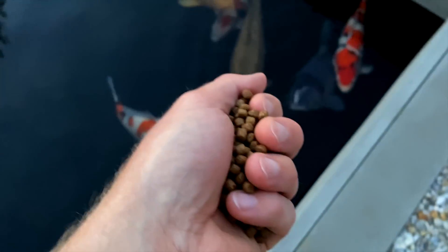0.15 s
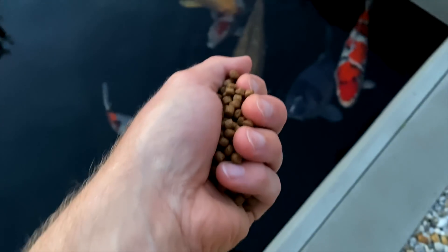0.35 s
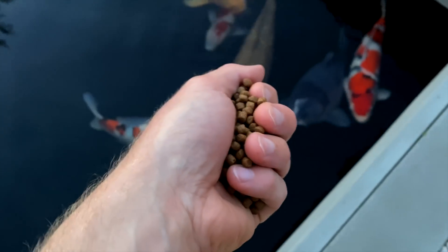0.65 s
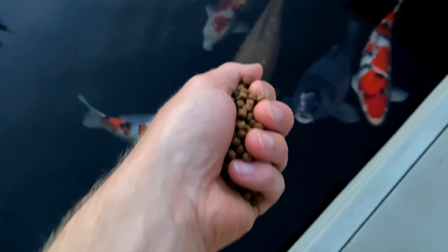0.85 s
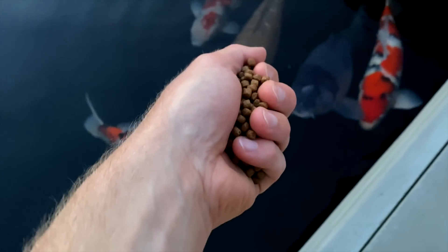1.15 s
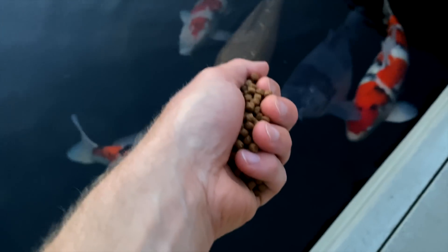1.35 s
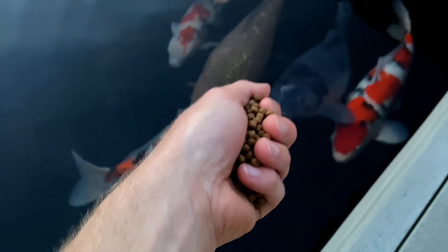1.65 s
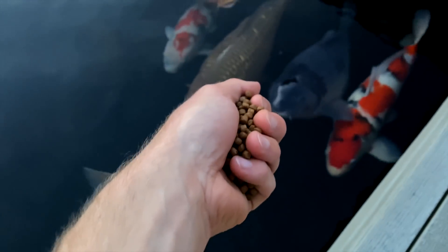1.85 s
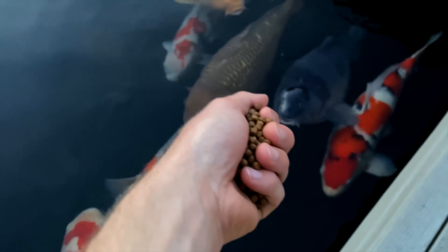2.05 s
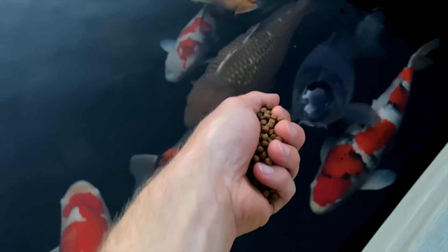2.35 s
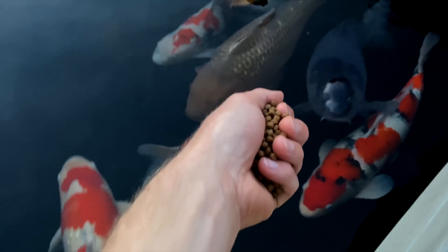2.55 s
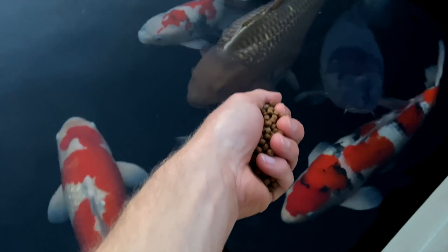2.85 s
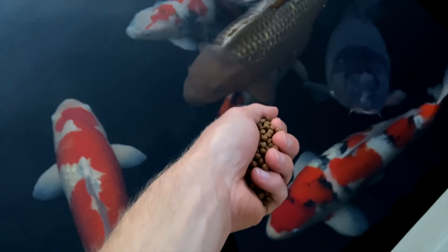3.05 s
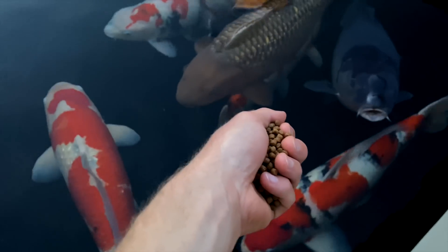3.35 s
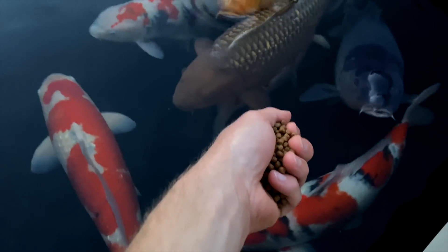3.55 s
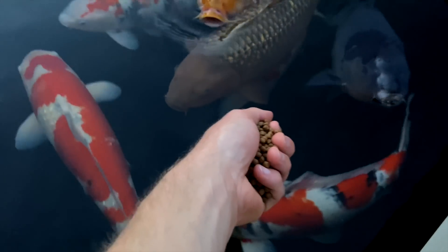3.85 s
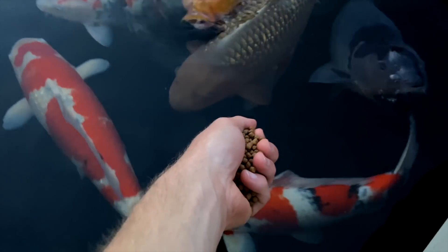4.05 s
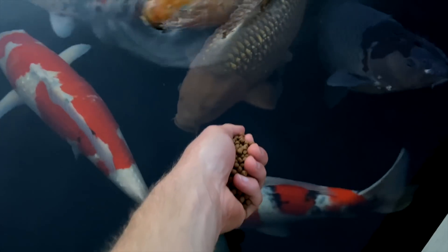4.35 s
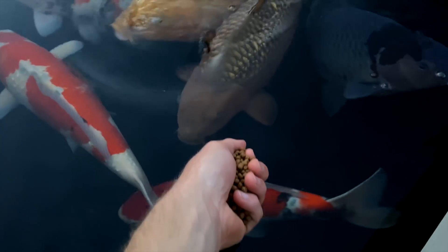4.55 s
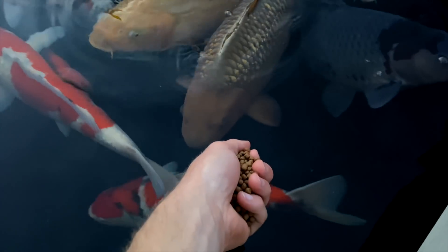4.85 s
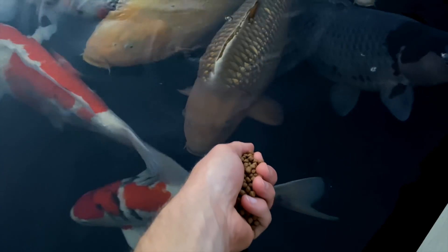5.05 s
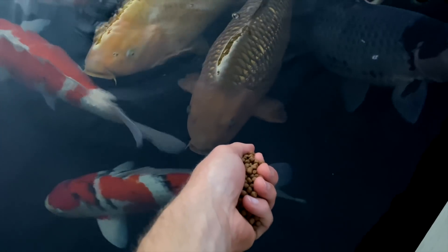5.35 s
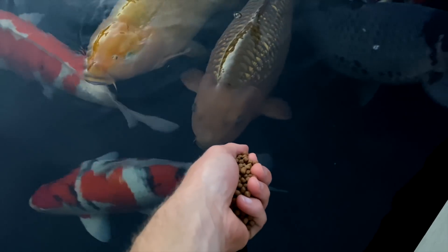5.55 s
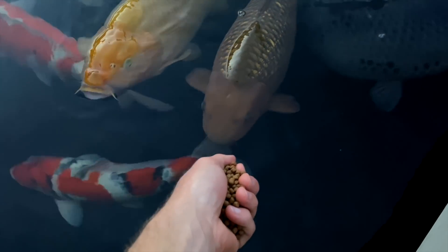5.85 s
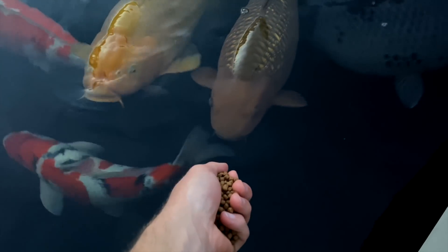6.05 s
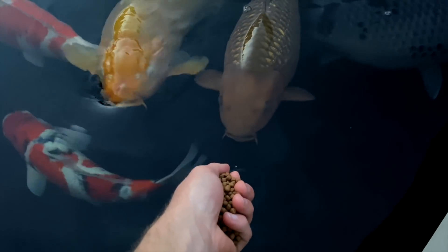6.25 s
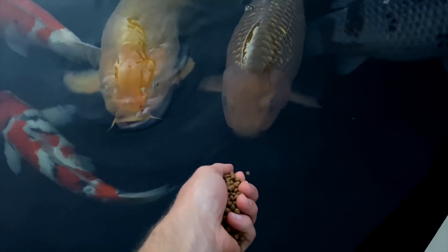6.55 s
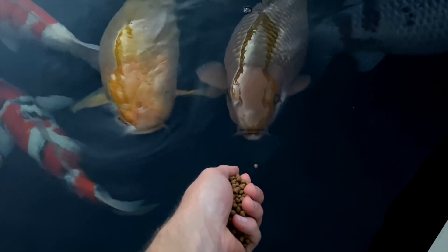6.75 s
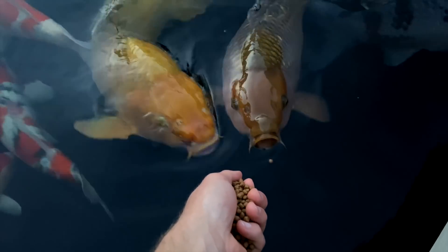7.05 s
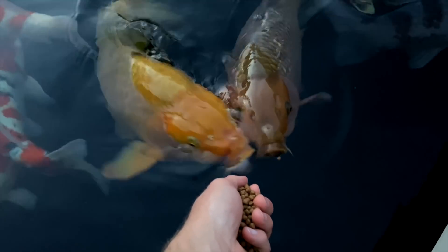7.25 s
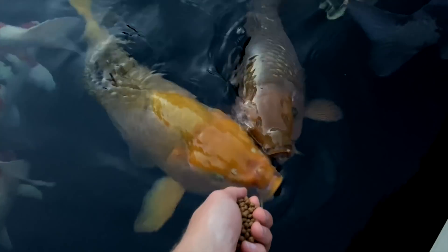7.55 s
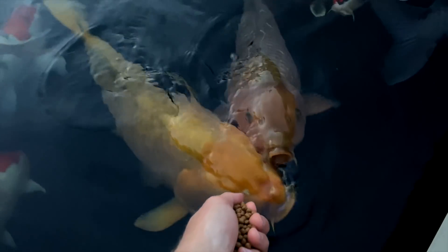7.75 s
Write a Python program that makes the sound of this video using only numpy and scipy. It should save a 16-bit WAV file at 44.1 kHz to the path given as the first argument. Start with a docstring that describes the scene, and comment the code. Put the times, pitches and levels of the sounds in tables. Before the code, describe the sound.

Steady mains hum and hissing, trickling water, bright dry pellet clicks close by, then small wet snaps as koi break the surface.

```python
"""An electric pump hums beside a koi pond over running water; both swell in while food pellets crackle in a fist.
The hum is a sum of mains harmonics and wavering housing tones; the water is filtered noise with ringing bubbles.
Pellets are decaying noise bursts and air bumps the microphone as low noise; water rings hollow in a narrow band,
and a thin whistle and faint chirps are wavering tones.
Fish break the surface midway and at the end: a snap, a ringing bubble, spray and a wall echo."""
import sys
import numpy as np
from scipy import signal
from scipy.fft import rfft, irfft, next_fast_len
from scipy.io import wavfile
from scipy.ndimage import uniform_filter1d

SR = 44100
rng = np.random.default_rng(int(sys.argv[2]) if len(sys.argv) > 2 else 0)


def dump_mix(stems):
    """Bounce the given channels to the path in sys.argv[1] as a 16-bit WAV at rate SR."""
    frames = np.atleast_2d(stems).T  # one column per channel
    limited = np.clip(frames, -1, 1)  # hard clip at full scale
    pcm = np.round(limited * 32767).astype(np.int16)
    wavfile.write(sys.argv[1], SR, pcm)


N = 348831
TIME = np.arange(N) / SR
HUM_RISE_S = 1.08  # shared by the hum and the rumble


def gain_of(db):
    """Level to amplitude: 20 dB is a factor of ten."""
    return 10 ** (np.asarray(db) / 20)


def evened(x):
    """Normalization by the root mean square, to rms 1."""
    return x / np.sqrt(np.mean(x ** 2) + 1e-20)


def read(points, hz):
    """Spectral envelope: straight lines between points on a log-frequency axis."""
    f, value = np.transpose(points)
    return np.interp(np.log(hz + 1), np.log(f + 1), value)


def bell(hz, centre_hz, octaves):
    """Resonance curve: a Gaussian in log frequency, down to 1/e at the given distance in octaves."""
    return np.exp(-(np.log2(hz / centre_hz) / octaves) ** 2)


def add(mix, s, sound):
    """Superposition: adds a stereo sound into the mix at time s."""
    part = mix[:, max(round(s * SR), 0):][:, :sound.shape[1]]
    part += sound[:, :part.shape[1]]


def wander(rate_hz, count=10):
    """Slow random modulation: sines of random speed up to rate_hz and random phase, rms about 1."""
    coarse = TIME[::128]
    speed, phase = rng.random((2, count, 1))
    sines = np.sin(2 * np.pi * (rate_hz * speed * coarse + phase))
    return np.interp(TIME, coarse, sines.sum(0) * np.sqrt(2 / count))


def swell(start_db, rise_s):
    """Stretched-exponential approach: a level in dB that climbs from start_db and settles at 0."""
    rise_shape = 1.28  # above 1 the rise starts slowly
    return start_db * np.exp(-(TIME / rise_s) ** rise_shape)


def bumps(rows):
    """Gaussian level changes in dB, from rows of (centre [s], half length [s], level [dB])."""
    return sum(db * np.exp(-((TIME - s) / half) ** 2) for s, half, db in rows)


def held(start, end, fade_s):
    """Trapezoidal envelope: fades in around start, holds, and fades out around end."""
    return np.clip(np.minimum(TIME - start, end - TIME) / fade_s + .5, 0, 1)


def band_noise(size, hz, octaves):
    """Spectral filtering: two unrelated white noises shaped to a bell-shaped band."""
    f = np.fft.rfftfreq(size, 1 / SR) + 1
    white = rng.standard_normal((2, size))
    return evened(irfft(rfft(white) * bell(f, hz, octaves), size))


def paired(z, same):
    """Partial coherence: gives two unrelated signals the correlation same."""
    same = np.clip(same, -1, 1)
    return np.array([z[0], same * z[0] + np.sqrt(1 - same ** 2) * z[1]])


def at_ports(z, hz):
    """Spaced reception: coherence, phase and level between two ports, for spectra with frequency last."""
    # two spaced microphone ports; the treble comes from one side:
    # (frequency [Hz], coherence, phase by which right leads [rad], left-right level [dB])
    ports = [(25, 0.9, 1.5, -1), (60, 1, 0, -1.5), (130, 0.91, 0.13, 0), (290, 0.85, 0, -1.5),
             (460, 0.77, -0.5, 0.5), (607, 0.58, -0.2, 0.5), (922, 0.22, -1.28, -0.5),
             (1480, 0.049, -4.5, -1), (1880, 0.88, -4.5, -1.5), (2310, 0.26, -6.5, -0.7),
             (3250, 0.27, -7, -1), (4400, 0.82, -7.5, -1), (5330, 0.19, -6, 1.5), (6870, 0.27, -6, 0.5),
             (8650, 1, -2.5, 0), (10170, 1, -0.03, 0), (12170, 1, 3.5, -1.5), (15300, 0.96, 8, 1)]
    f, *columns = np.transpose(ports)
    same, lead, pan_db = (np.interp(hz, f, column) for column in columns)
    left, right = paired(z, same)
    return np.array([left * gain_of(pan_db / 2), right * gain_of(-pan_db / 2) * np.exp(1j * lead)])


def soft_bursts(rows, octaves, same):
    """Windowed band noise, one burst for each row (centre [s], length [s], frequency [Hz], level [dB])."""
    out = np.zeros((2, N))
    for s, length, hz, db in rows:
        size = round(length * SR)
        burst = paired(band_noise(SR, hz, octaves), same)[:, :size] * np.hanning(size)
        add(out, s - length / 2, gain_of(db) * evened(burst))
    return out


def tones(rows, waver_db, slip):
    """Amplitude and phase modulation: steady tones that waver in level and slip in phase (radians)."""
    total = 0
    for hz, db in rows:
        level = gain_of(db + waver_db * wander(2))
        total = total + level * np.sin(2 * np.pi * (hz * TIME + rng.random()) + slip * wander(2))
    return np.sqrt(2) * total


def buzz(low_hz=270, high_hz=780, level_db=-64, tilt_db=-1, waver_db=2, count=26):
    """Inharmonic partials of the rattling pump casing, each with its own phase at the two ports."""
    out = np.zeros((2, N))
    for index, (offset, phase, side) in enumerate(rng.random((count, 3))):
        hz = low_hz * (high_hz / low_hz) ** ((index + offset) / count)
        level = gain_of(level_db + tilt_db * np.log2(hz / low_hz) + waver_db * wander(1.55))
        port_phase = np.array([[0], [2 * side - 1]])
        out += np.sqrt(2) * level * np.sin(2 * np.pi * (hz * TIME + phase) + port_phase)
    return out


def pump(waver_db=0.13, overtone_waver_db=0.4):
    """Harmonic vibration: the motor hums on multiples of the mains; its housing shakes less steadily."""
    mains_hz, start_db = 50.01, -15.5
    # harmonics of the hum: (multiple of the mains, level [dB], left-right level [dB])
    harmonics = [(2, -26, -1.1), (3, -40, -3.5), (4, -38.5, -4), (5, -53.5, 1), (6, -53.5, -9),
                 (7, -56.5, -5), (8, -59.5, -3)]
    # wavering tones of the shaking housing: (frequency [Hz], level [dB])
    housing = [(112.5, -49), (118.8, -47), (158.8, -55), (163, -53), (181.1, -48.5), (212.6, -52),
               (218.7, -56), (231.2, -58), (262.5, -57.5), (268.7, -57), (287.5, -59.5), (331.2, -61.5),
               (337.5, -60.5), (412.5, -60), (462.6, -55), (468.8, -56), (531, -55)]
    # brief dips of the hum: (centre [s], half length [s], level change [dB])
    dips = [(4.8, .15, -3), (7.6, 0.15, -2)]
    out = np.zeros((2, N)) + tones(housing, waver_db=1.5, slip=0.48) + buzz()
    for index, (multiple, db, pan_db) in enumerate(harmonics):
        depth_db = overtone_waver_db if index else waver_db
        line = np.sqrt(2) * np.sin(2 * np.pi * (multiple * mains_hz * TIME + rng.random()))
        sides = gain_of([[pan_db / 2], [-pan_db / 2]])
        out += sides * gain_of(db + depth_db * wander(4.4)) * line
    return out * gain_of(swell(start_db, HUM_RISE_S) + bumps(dips))


def drone():
    """Beating: deep tones of close frequency throb against the hum."""
    # tones of the drone: (frequency [Hz], level [dB])
    deep_tones = [(53, -54), (56, -52), (62.6, -51), (69.4, -44.5)]
    # two passing rises of the drone: (centre [s], half length [s], level change [dB])
    rises = [(1.45, 0.65, 9), (5.95, 1.0, 6.5)]
    sides = gain_of([[-.3], [.3]])
    return tones(deep_tones, waver_db=1, slip=0.32) * gain_of(bumps(rises)) * sides


def rumble(level_db=-36.5, start_db=-8):
    """Long wavelengths reach both ports nearly alike: low churning noise of high coherence."""
    # spectrum of the churning: (frequency [Hz], relative level per hertz [dB])
    spectrum = [(15, -40), (30, -17), (42, -18), (54, 2.5), (70, -4.5), (85, -2.5), (120, -5), (150, -6.5),
                (210, -8), (280, -13), (420, -31), (900, -62)]
    size = next_fast_len(N)
    hz = np.fft.rfftfreq(size, 1 / SR)
    z = at_ports(rfft(rng.standard_normal((2, size))), hz) * gain_of(read(spectrum, hz))
    return evened(irfft(z, size)[:, :N]) * gain_of(level_db + swell(start_db, HUM_RISE_S))


def water_db(surge_s=1.93, surge_half_s=1.0, surge_db=1.5):
    """Slow level envelope in dB: the running water swells in, surges a little and settles."""
    return swell(start_db=-8.5, rise_s=1) + bumps([(surge_s, surge_half_s, surge_db)])


def smoothed_field(shape, bins, frames):
    """Local averaging: a random time-frequency field smoothed over bins and frames, rms 1."""
    field = uniform_filter1d(rng.standard_normal(shape), size=bins, axis=0)
    return evened(uniform_filter1d(field, size=frames, axis=1))


def wash(level_db=-35.5, patchy_db=1.5, flicker_db=0.86, drift_db=1.0):
    """Time-varying filtering: running water as noise with restless patches and shifting resonances."""
    # spectrum of the water: (frequency [Hz], relative level per hertz [dB])
    spectrum = [(100, -9), (250, -1.5), (380, -1.4), (560, -2), (900, -1.5), (1250, -5.5), (1900, -11.5),
                (2500, -13.5), (3300, -17.5), (4200, -18.5), (5500, -22), (7200, -24), (10000, -22.5),
                (12000, -28), (14500, -25), (16000, -45)]
    # resonances that shift as the microphone moves: (time [s], hollow frequency [Hz], hollow level [dB],
    # bright frequency [Hz], bright level [dB], nasal level [dB])
    resonances = [(0, 900, 0.5, 2800, 1, -2), (1.2, 860, 1, 2800, -0.5, 0.5), (2.6, 780, 5, 3370, 1.5, 0),
                  (3.2, 810, 2, 3700, 3, 1.5), (3.6, 950, 3.5, 4000, 5.5, 0.5),
                  (4.3, 935, 2, 3750, 4, -0.5), (5.2, 940, 5, 3680, 6.5, -0.5),
                  (6.0, 925, 3.5, 4770, 0, -0.5), (7.0, 940, 4.5, 4950, 0, -.5),
                  (7.7, 930, 5, 4600, -1, -0.5)]
    # low middle missing at first: (centre [Hz], width [octaves], starting level [dB], filling time [s])
    thin_start = (390, 0.5, -1.5, 0.2)
    resonance_octaves, nasal_hz, nasal_octaves = 0.11, 1190, 0.39

    hz, t, z = signal.stft(rng.standard_normal((2, N)), SR, nperseg=1024, noverlap=768)
    z = at_ports(z.swapaxes(1, 2), hz).swapaxes(1, 2)
    hz = hz[:, None]
    patches = smoothed_field(z.shape[1:], bins=8, frames=8)
    drift = smoothed_field(z.shape[1:], bins=4, frames=60)  # narrow bands that change slowly
    flicker = rng.standard_normal(len(t))  # all frequencies together
    field_db = read(spectrum, hz) + patchy_db * patches + drift_db * drift + flicker_db * flicker

    s, *columns = np.transpose(resonances)
    hollow_hz, hollow_db, bright_hz, bright_db, nasal_db = (np.interp(t, s, column) for column in columns)
    field_db = field_db + hollow_db * bell(hz + 1, hollow_hz, resonance_octaves)
    field_db = field_db + bright_db * bell(hz + 1, bright_hz, resonance_octaves)
    field_db = field_db + nasal_db * bell(hz + 1, nasal_hz, nasal_octaves)

    thin_hz, thin_octaves, thin_db, fill_s = thin_start
    filling_db = np.interp(t, TIME, swell(thin_db, fill_s))
    field_db = field_db + filling_db * bell(hz + 1, thin_hz, thin_octaves)
    water = signal.istft(z * gain_of(field_db), nperseg=1024, noverlap=768)[1][:, :N]
    return gain_of(level_db + water_db()) * evened(water)


def trickle(level_db=-53, per_s=300, spread_db=3.5, cycles=7, tilt_db=-2.0, count=28):
    """Damped oscillation: tiny bubbles in the running water, each ringing for a few cycles."""
    out, t = np.zeros((2, N)), np.arange(2048) / SR
    tries = 200  # possible bubbles at each pitch
    for hz in np.geomspace(700, 8000, count):
        # the root of the frequency offsets the shorter ring of small bubbles
        weight = gain_of(tilt_db * np.log2(hz / 1000)) * np.sqrt(hz)
        ring = weight * np.sin(2 * np.pi * hz * t) * np.exp(-t * hz / cycles)
        for when, size, side, chance in rng.random((tries, 4)):
            if chance < per_s * TIME[-1] / count / tries:
                bubble = ring * gain_of(spread_db * min(-np.log(size), 4))
                sides = [np.cos(np.pi * side), np.sin(np.pi * side)]  # the left may be inverted
                add(out, when * TIME[-1], np.outer(sides, bubble))
    return gain_of(level_db + water_db()) * evened(out)


def puffs():
    """Pressure fluctuation of moving air: soft low bumps on the microphone."""
    # puffs of air: (centre [s], length [s], frequency [Hz], level [dB])
    air_bumps = [(.02, 0.078, 149, -41.5), (.06, 0.24, 64, -38), (0.659, .1, 68.4, -36),
                 (2.235, 0.135, 46, -36.5), (4.47, .2, 190, -42), (4.501, .3, 87, -33.5),
                 (4.615, 0.173, 54, -31), (4.763, 0.15, 70.4, -33), (4.851, 0.15, 148, -32.5)]
    return soft_bursts(air_bumps, octaves=0.39, same=0.76)


def faint_slips(per_s=2.5, level_db=-34.5, decay_s=0.0023, middle_hz=8950, count=60):
    """Random arrivals: small pellet slips as rows (time [s], level [dB], decay [s], frequency [Hz])."""
    rows = []
    for when, colour, chance in rng.random((count, 3)):
        if chance < per_s * TIME[-1] / count:
            rows.append((when * TIME[-1], level_db, decay_s, middle_hz * 2 ** (colour - .5)))
    return rows


def pellets(octaves=0.82, rise_s=0.0011, crumble_db=-20, crumble_hz=4500, crumble_octaves=2.5,
            crumble_s=0.026, grain_db=2):
    """Stick-slip friction: dry pellets scrape brightly; their neighbours settle with a duller crumble."""
    # clearest slips of pellets in the fist, and a few sharp bright ticks near the end: (time [s], level [dB],
    # decay time [s], brightest frequency [Hz])
    slips = [(.025, -35, 0.006, 3800), (.036, -41, 0.0055, 4500), (0.0495, -32, 0.0033, 7100),
             (.5698, -19.5, 0.0016, 10000), (.5758, -25, .0013, 11000), (0.582, -24, 0.0033, 11000),
             (0.5935, -21.5, 0.006, 11000), (1.079, -32, 0.0037, 13000), (1.451, -24, 0.0015, 9000),
             (1.511, -22.5, 0.0017, 9000), (1.574, -35, .006, 12000), (1.8138, -22.5, 0.0018, 8500),
             (1.8175, -25, 0.0022, 4470), (1.832, -30, .002, 4500), (1.845, -39, .008, 5000),
             (2.166, -25, 0.0016, 9400), (2.3416, -27, .002, 6900), (2.418, -26, 0.0021, 10000),
             (2.428, -28, .002, 10000), (2.443, -30, 0.0024, 3800), (3.935, -32, .0022, 7900),
             (5.317, -28, 0.0024, 10000), (6.1205, -31.5, 0.0027, 11000), (6.155, -33, .003, 11000),
             (7.466, -20, 0.00072, 10000), (7.488, -28, .0015, 14500), (7.626, -31, .0015, 14000),
             (7.6955, -26, 0.0012, 13500)]
    out, t = np.zeros((2, N)), np.arange(4096) / SR
    bins = np.fft.rfftfreq(len(t), 1 / SR)
    for s, db, decay, hz in slips + faint_slips():
        roughness = evened(uniform_filter1d(rng.standard_normal(len(t)), size=32))
        grains = evened(gain_of(grain_db * roughness))
        bright = at_ports(rfft(band_noise(len(t), hz, octaves)), bins)
        scrape = irfft(bright) * np.exp(-t / decay)
        dull = gain_of(crumble_db) * band_noise(len(t), crumble_hz, crumble_octaves)
        crumble = dull * np.exp(-t / min(crumble_s, 10 * decay))
        onset = 1 - np.exp(-t / min(rise_s, decay / 2))
        add(out, s, gain_of(db) * (scrape + crumble) * grains * onset)
    return out


def pipe(fade_s=0.26, same=0.46):
    """Resonance, as in a pipe: water rings hollow in a narrow band that holds, then sinks into the wash."""
    # hollow ring: (start [s], end [s], frequency [Hz], width [octaves], level [dB])
    hollow_ring = (0.3, 1.64, 569, 0.05, -46.5)
    start, end, hz, octaves, db = hollow_ring
    ring = paired(band_noise(next_fast_len(N), hz, octaves), same)[:, :N]
    return gain_of(db) * held(start, end, fade_s) * ring


def gurgles():
    """Narrow-band surges: brief gurgles that stand out of the running water."""
    # surges of the water: (centre [s], length [s], frequency [Hz], level [dB])
    surges = [(.465, 0.11, 1380, -50.5), (.55, 0.063, 1450, -52), (.5, .6, 520, -50),
              (.853, 0.05, 1400, -48), (.87, .1, 2760, -54), (1.19, 0.32, 650, -45.5), (1.35, .5, 320, -46),
              (3.46, 0.44, 1130, -51), (5.31, 0.051, 3850, -48)]
    return soft_bursts(surges, octaves=0.31, same=0.53)


def whistle(flutter_db=3.0, flutter_hz=22, fade_s=0.32, jitter_hz=14, waver_hz=5, faint_lead=2.25,
            note_lead=0.4):
    """Interaural phase places a thin whistle: faint partials out of step, two clear notes near the middle."""
    # faint fluttering partials: (start [s], end [s], frequency [Hz], level [dB])
    partials = [(1.1, 4.4, 2105, -52.5), (2.1, 2.65, 2100, -51), (2.9, 3.6, 2110, -49),
                (0.91, 3.3, 1570, -56)]
    # clear notes: (centre [s], length [s], level [dB])
    clear_notes = [(1.89, 0.15, -46), (2.012, 0.13, -41)]
    note_hz = 2090
    faint = 0
    for start, end, hz, db in partials:
        level = held(start, end, fade_s) * gain_of(db + flutter_db * wander(flutter_hz))
        faint = faint + level * np.exp(2j * np.pi * np.cumsum(hz + jitter_hz * wander(45)) / SR)
    envelope = 0
    for s, length, db in clear_notes:
        envelope = envelope + gain_of(db) * np.cos(np.pi * np.clip((TIME - s) / length, -.5, .5))
    clear = envelope * np.exp(2j * np.pi * np.cumsum(note_hz + waver_hz * wander(39.7)) / SR)
    # the right port leads by these phases in radians
    right = faint * np.exp(1j * faint_lead) + clear * np.exp(1j * note_lead)
    return np.sqrt(2) * np.real([faint + clear, right])


def chirps(rise_hz_per_s=600, jitter_hz=45):
    """Frequency modulation: faint airy chirps that slide gently upwards with a random jitter."""
    # chirps: (centre [s], length [s], middle frequency [Hz], level [dB])
    slides = [(2.41, 0.1, 3230, -57), (2.679, .3, 3470, -60), (3.372, 0.065, 4090, -53.5)]
    out = np.zeros((2, N))
    for s, length, hz, db in slides:
        size = round(length * SR)
        pitch = hz + rise_hz_per_s * (TIME[:size] - length / 2) + jitter_hz * wander(91)[:size]
        tone = np.sin(2 * np.pi * np.cumsum(pitch) / SR)
        chirp = gain_of(db) * evened(tone * np.hanning(size))
        add(out, s - length / 2, np.array([chirp, chirp]))
    return out


def splashes():
    """Broad incoherent turbulence: water slops loosely around the fish."""
    # soft slops: (centre [s], length [s], frequency [Hz], level [dB])
    slops = [(2.435, .06, 2800, -48), (7.632, .024, 5200, -50), (7.71, .05, 3200, -50)]
    return soft_bursts(slops, octaves=0.43, same=0.42)


def plips(snap_s=0.00009, snap_hz=4200, rise_s=0.0001, glide_per_s=3.6, low_edge=0.89, spray_db=-21,
          spray_s=0.0093, wall_db=-7):
    """Bubble resonance: the surface snaps, a trapped bubble rings upwards, spray follows, the pond wall echoes."""
    # fish breaking the surface: (time [s], level [dB], bubble frequency [Hz], decay time [s],
    # snap relative to the bubble [dB])
    breaks = [(4.429, -29, 2030, .004, -16), (4.445, -35, 2000, .005, -12), (7.488, -16, 2390, 0.0012, 7),
              (7.6255, -27, 6170, .0008, -6), (7.6315, -25, 3100, 0.001, 7), (7.657, -32, 2600, .001, -3),
              (7.697, -25, 2500, 0.0017, -2), (7.706, -26, 3400, .001, -6), (7.709, -25, 3000, .0008, -6),
              (7.716, -30, 1770, .005, -14), (7.758, -33, 2150, .003, -14)]
    wall_echo_s = 0.003
    fish_lag_s = 0.00009  # the fish are to the left, so the right port hears them later
    out, t = np.zeros((2, N)), np.arange(4096) / SR
    late = np.maximum(t - np.array([[0], [fish_lag_s]]), 0)
    for s, db, hz, decay, snap_db in breaks:
        ring = np.sin(2 * np.pi * hz * late * (1 + glide_per_s * late / 2))
        bubble = ring * np.exp(-late / decay) * (1 - np.exp(-late / rise_s))
        snap_envelope = late / snap_s * np.exp(1 - late / snap_s)
        snap = gain_of(snap_db) * np.sin(2 * np.pi * snap_hz * late) * snap_envelope
        highpass = signal.butter(4, low_edge * hz, "highpass", fs=SR, output="sos")
        pop = signal.sosfilt(highpass, bubble + snap)
        mist = paired(band_noise(len(t), hz * 1.16, 0.36), 0.23)
        spray = gain_of(spray_db) * mist * np.exp(-t / spray_s)
        plip = gain_of(db) * (pop + spray) * gain_of([[-.9], [.9]])
        add(out, s, plip)
        add(out, s + wall_echo_s, gain_of(wall_db) * plip)
    return out


def scene():
    """Linear superposition: pump and water behind, hand and fish in front."""
    machine = pump() + drone() + rumble()
    water = wash() + trickle() + pipe() + gurgles()
    air = puffs() + whistle() + chirps()
    fish = splashes() + plips()
    return machine + water + air + pellets() + fish


def record(dry):
    """Band limitation: a linear-phase low-pass filter removes the highest treble."""
    edge_hz = 15700
    lowpass = signal.firwin(511, edge_hz, window=("kaiser", 9), fs=SR)
    return signal.oaconvolve(dry, lowpass[None], "same")


dry = scene()
out = record(dry)
dump_mix(out)
```